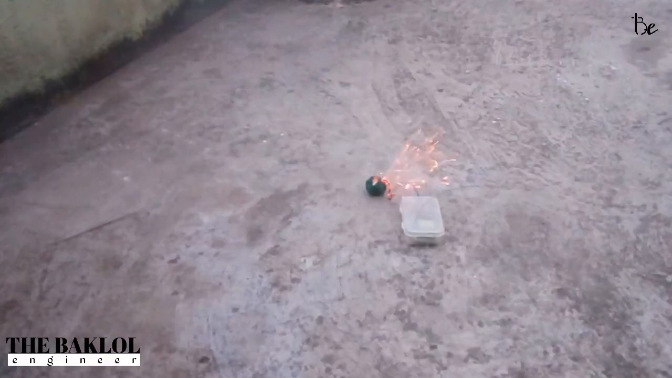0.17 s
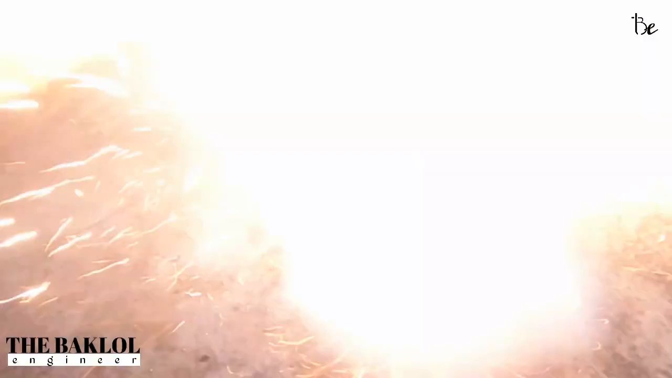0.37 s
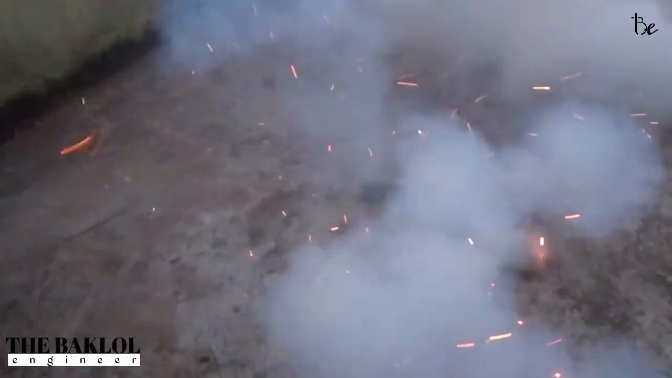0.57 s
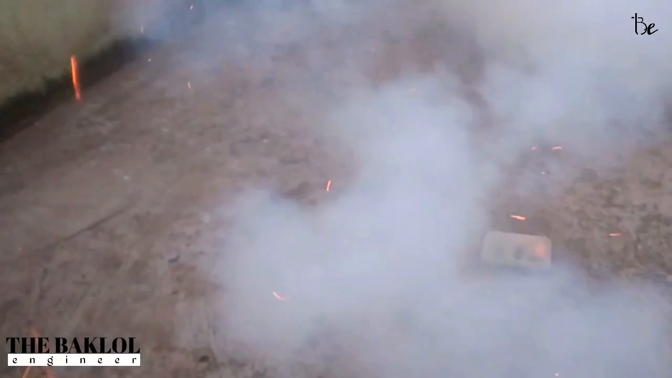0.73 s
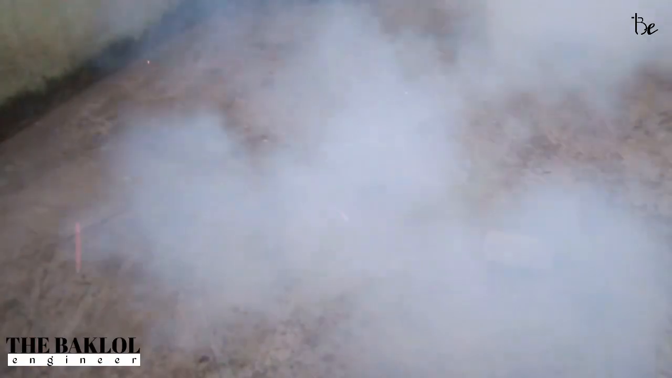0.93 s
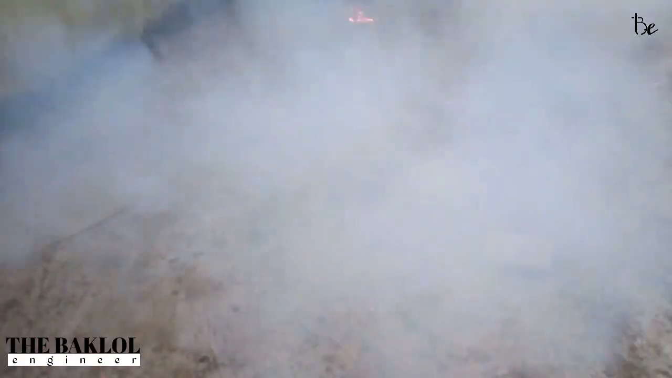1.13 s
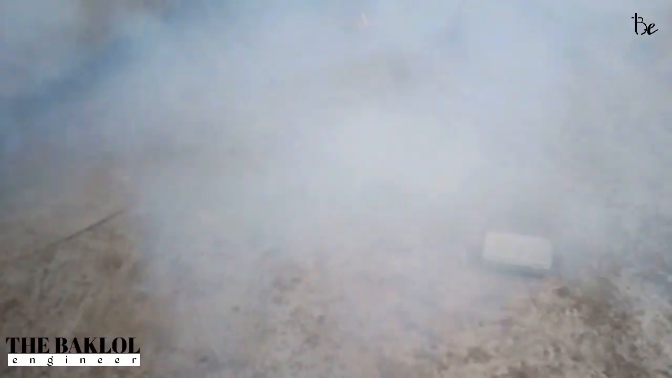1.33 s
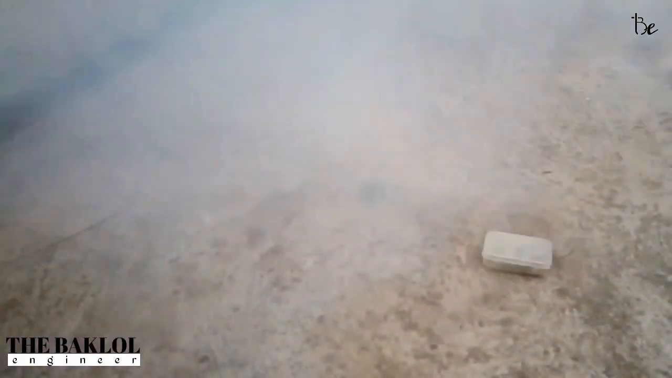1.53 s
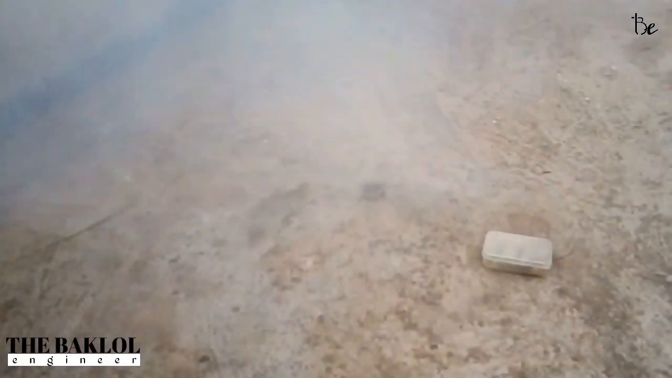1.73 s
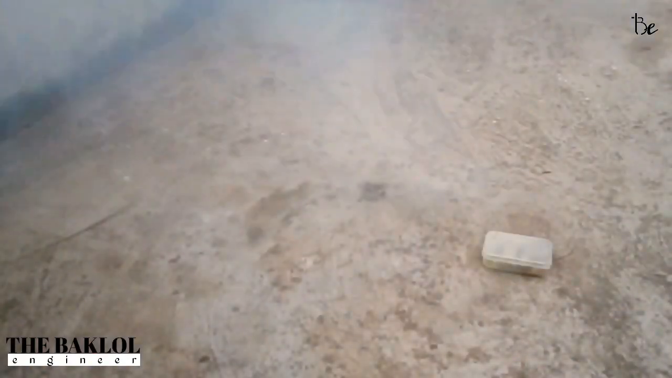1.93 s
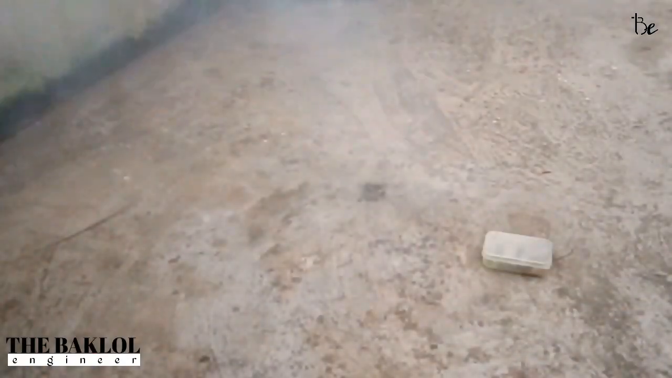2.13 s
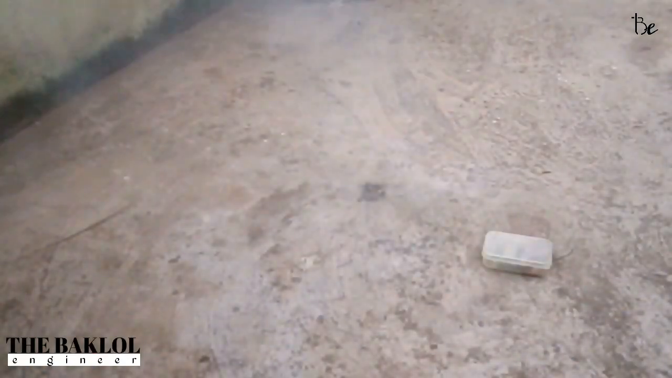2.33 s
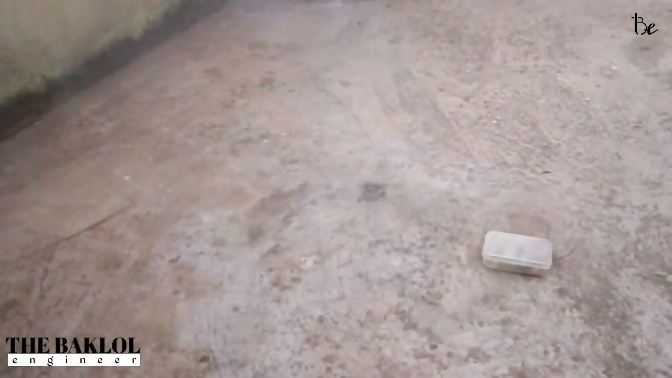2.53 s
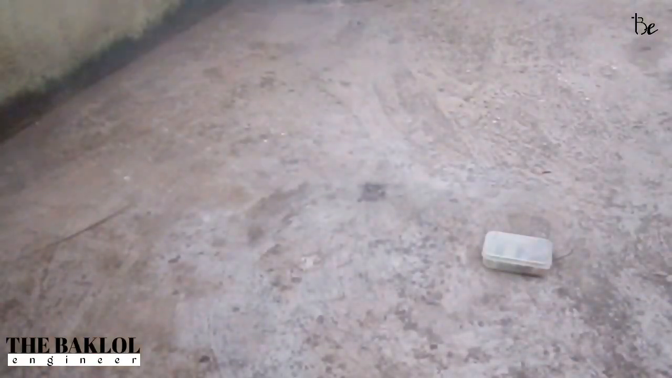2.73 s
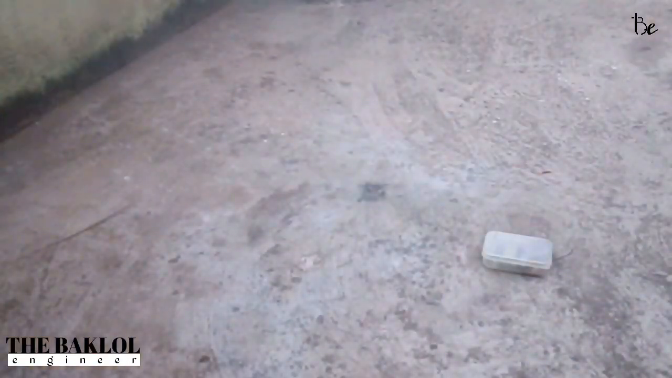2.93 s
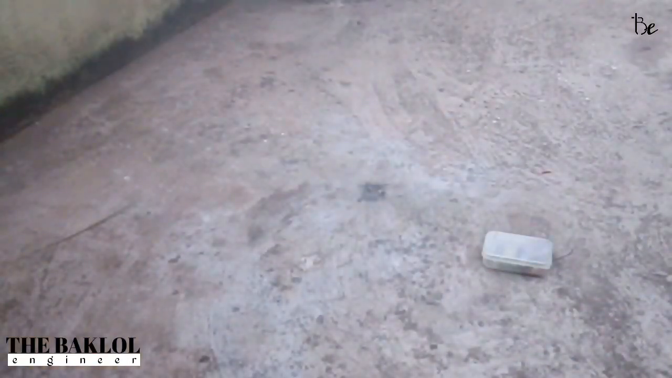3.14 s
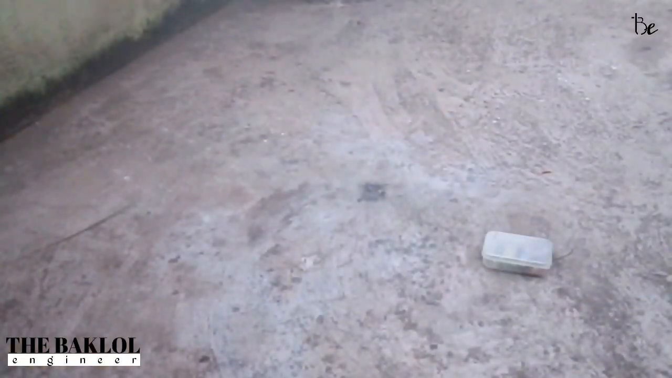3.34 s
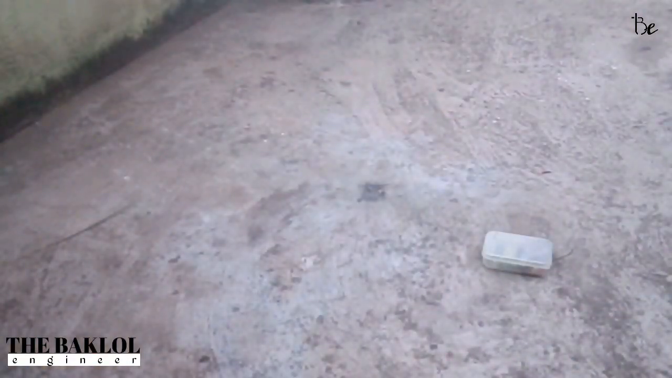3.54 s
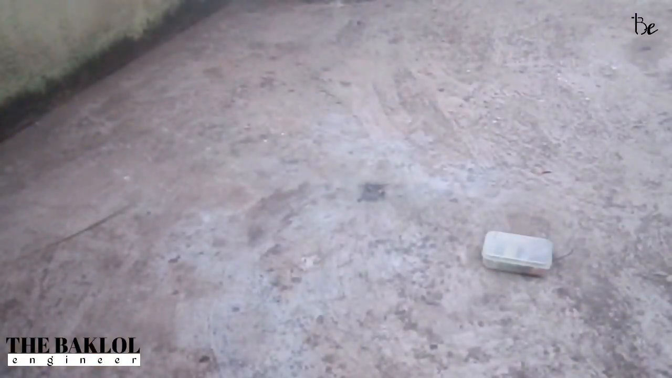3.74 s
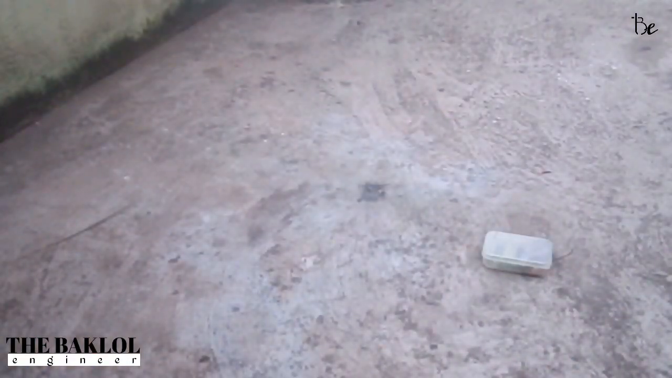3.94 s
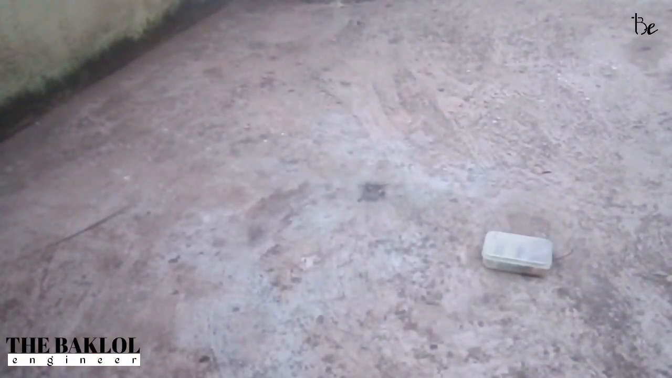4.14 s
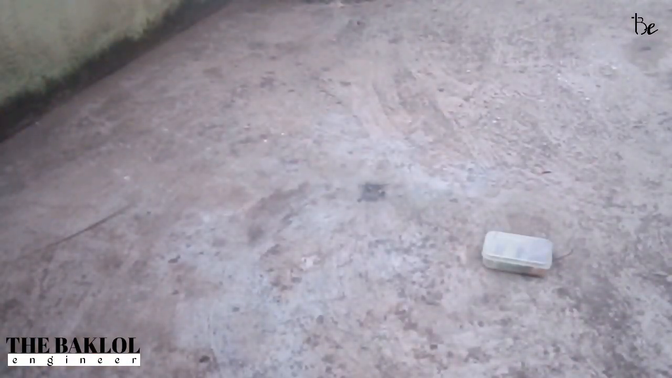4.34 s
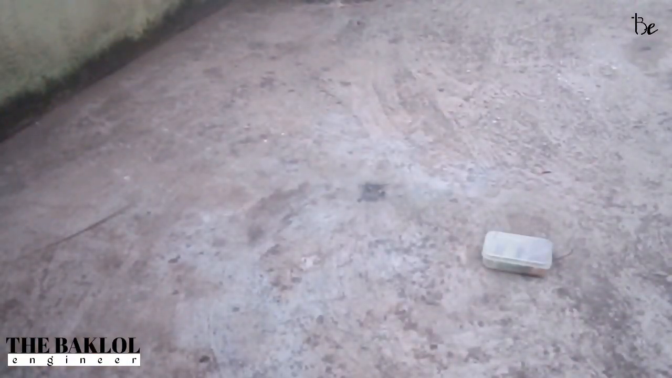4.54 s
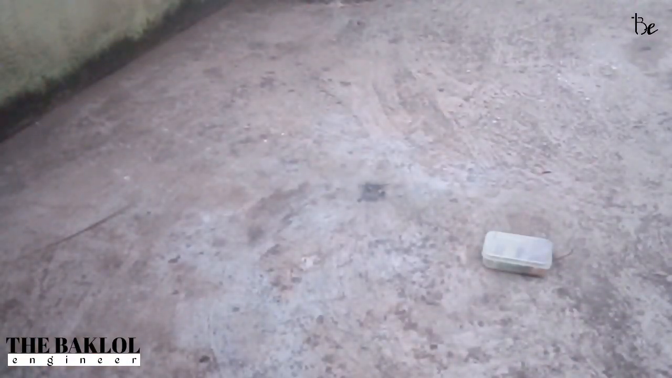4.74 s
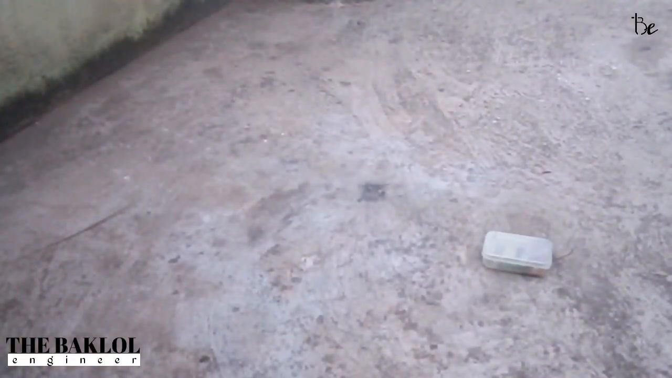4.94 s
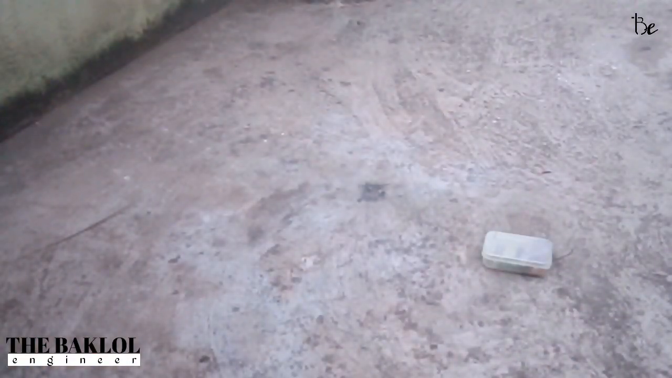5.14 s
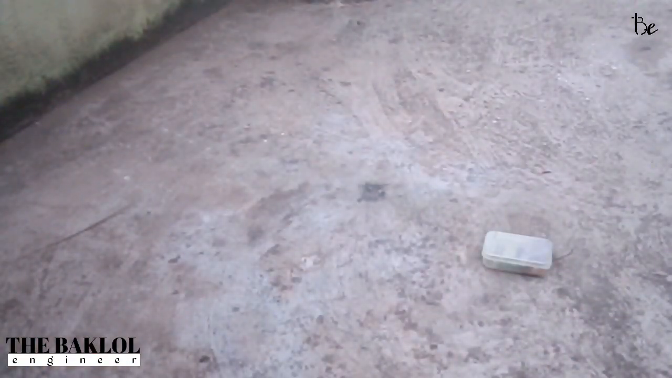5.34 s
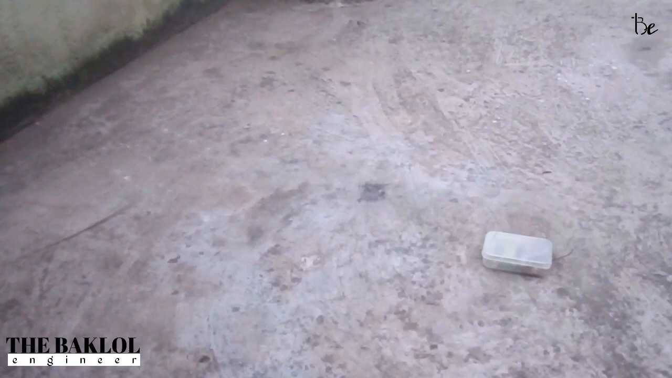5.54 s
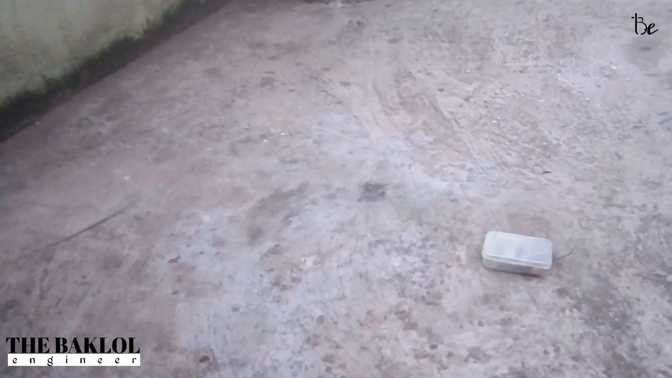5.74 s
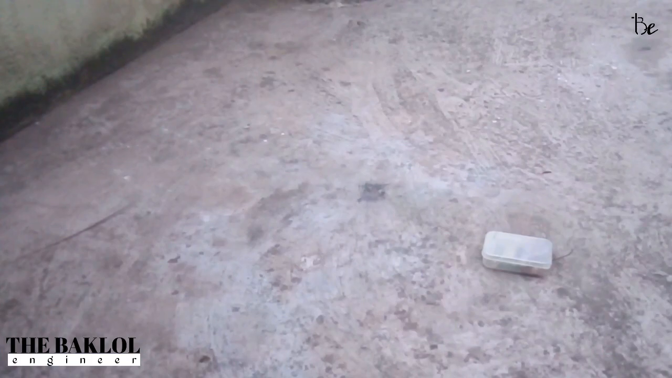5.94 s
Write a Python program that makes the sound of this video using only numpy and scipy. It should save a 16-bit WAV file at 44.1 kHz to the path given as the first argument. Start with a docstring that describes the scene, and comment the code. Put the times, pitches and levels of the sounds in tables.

```python
"""Firecracker in a concrete yard

A fuse hisses as shaped noise, then a ball firecracker bursts as an N-wave and overloads the microphone.
Decaying noise bands slap off near walls and roll back from further off, duller with distance; resonant
sheet metal hums after it. Crickets trill as pulsed tones and birds call as gliding sines; grit ticks as
damped sines and crunches as click swarms near the microphone, over a low noise murmur of town."""
import sys
import numpy as np
from scipy import signal
from scipy.fft import rfft, irfft
from scipy.io import wavfile
from scipy.ndimage import uniform_filter1d

SR = 44100
rng = np.random.default_rng(int(sys.argv[2]) if len(sys.argv) > 2 else 0)


def convert_level_to_amplitude(level_db):
    """Map a level in decibels to its linear amplitude factor."""
    exponent = np.asarray(level_db, float) / 20
    return 10 ** exponent


def transcribe(u):
    """Save the signal u as a 16-bit wav file named by the first command-line argument.

    u: samples, shape (n,) or (channels, n), limited to [-1, 1]; the rate is SR.
    q: integer samples, one column per channel.
    """
    v = np.clip(np.atleast_2d(u).T, -1, 1)
    q = np.round(v * 32767).astype(np.int16)
    wavfile.write(sys.argv[1], SR, q)


N = 268745
T = np.arange(N) / SR
BANG_S = 0.3262


def level(x, db):
    """Root-mean-square normalisation: scale to an rms level in dB."""
    return x * convert_level_to_amplitude(db) / np.sqrt(np.mean(x ** 2))


def read(table, hz, column=1):
    """Logarithmic frequency scale: interpolate a table column along log frequency."""
    table = np.array(table, float)
    return np.interp(np.log(hz), np.log(table[:, 0]), table[:, column])


def noise(colour, size=N):
    """Spectral shaping: Gaussian noise of a given colour, rms 1, silent outside the table."""
    hz = np.maximum(np.arange(size // 2 + 1) * SR / size, 1)
    inside = (hz >= colour[0][0]) & (hz <= colour[-1][0])
    spectrum = rfft(rng.standard_normal(size)) * convert_level_to_amplitude(read(colour, hz)) * inside
    return level(irfft(spectrum, size), 0)


def half_octave(hz):
    """Power-complementary bands: noise in a half-octave bell; neighbours sum to white noise."""
    octaves = np.log2(np.maximum(np.arange(N // 2 + 1) * SR / N, 1) / hz)
    bell = np.cos(np.pi * np.clip(octaves, -0.5, 0.5))
    return irfft(rfft(rng.standard_normal(N)) * bell, N)


def band(x, hz, width):
    """Simple resonance: a two-pole band-pass."""
    return signal.lfilter(*signal.iirpeak(min(hz, SR / 2.2), max(hz / width, 0.2), fs=SR), x)


def walk(rate):
    """Slow random modulation: levels held 1 / rate s and slewed; spread near 1."""
    hold = int(SR / rate)
    return uniform_filter1d(np.repeat(rng.standard_normal(N // hold + 1), hold), hold)[:N]


def add(out, s, x):
    """Superposition: mix a short sound in at a time."""
    i = int(s * SR)
    out[i:i + len(x)] += x[:N - i]


# Shock, wall slap and far roll.
# Near walls: frequency_hz, relative_density_db (per Hz), t60_s
WALL_SLAP = [(40, -21.5, .8), (151, -5, 0.91), (604, 1, 0.69), (2000, -7.5, 0.78), (6000, -4.5, 0.36),
             (8900, -14.5, .3)]
# Colour of the roll: frequency_hz, relative_density_db (per Hz)
ROLL_COLOUR = [(25, -19), (60, -4), (110, -7.5), (180, -2), (300, 1.5), (500, -8.5), (1000, -12.5),
               (2500, -19), (6000, -19), (9000, -26)]
# Loss that grows with travel: frequency_hz, extra_loss_db_per_s
AIR_LOSS = [(25, 8.5), (200, 4), (600, 3.5), (1500, 7.5), (4000, 19), (9000, 45)]
# Far echoes rolling back, with a late swell from the furthest surfaces: time_s, relative_level_db
ROLL_LEVEL = [(0.34, 1.5), (0.6, 13), (0.97, 4), (1.03, -1), (1.45, -9), (1.63, -17), (1.92, -12.5),
              (2.07, -17), (2.52, -22.5), (2.66, -28)]
SLAP_GAIN_DB, ROLL_FADE_DB_PER_S = 16, 8.5
SHOCK_PEAK_DB, SHOCK_S = 11.0, 0.0017


def bang():
    """Blast wave and reverberation: an N-shaped shock, dense decaying slaps, then a roll dulled by distance."""
    age = np.maximum(T - BANG_S, 0)
    slap, roll = 0, 0
    for hz in 25 * 2 ** np.arange(0, 9, 0.5):
        wave = half_octave(hz)
        slap_db = read(WALL_SLAP, hz) - 60 * age / read(WALL_SLAP, hz, column=2)
        slap = slap + wave * convert_level_to_amplitude(slap_db)
        # the air loss stops growing 1.6 s after the bang
        roll_db = read(ROLL_COLOUR, hz) - read(AIR_LOSS, hz) * np.minimum(age, 1.6)
        # far surfaces answer in patches, each band in its own order
        roll = roll + wave * convert_level_to_amplitude(roll_db + 3.1 * walk(14))
    # past the last far surface the roll dies away
    fade_db = ROLL_FADE_DB_PER_S * np.maximum(T - ROLL_LEVEL[-1][0], 0)
    roll = roll * convert_level_to_amplitude(np.interp(T, *np.transpose(ROLL_LEVEL)) - fade_db)
    out = (slap * convert_level_to_amplitude(SLAP_GAIN_DB) + roll) * (T > BANG_S)
    # the microphone inverts the shock: it starts negative
    add(out, BANG_S, convert_level_to_amplitude(SHOCK_PEAK_DB) * np.linspace(-1, 1, int(SHOCK_S * SR)))
    return out


# Single house fronts answering: start_s, peak_db, centre_hz
HOUSE_FRONTS = [(0.44, 1, 90), (0.878, -8, 180), (1.089, -16, 466), (1.327, -24.5, 310), (1.46, -21, 260),
                (1.606, -37, 463), (1.71, -33.5, 191), (2.331, -59, 258)]


def echoes():
    """Discrete reflection: each house front returns a short dull thud of band-passed noise."""
    out, t = np.zeros(N), np.arange(int(0.15 * SR)) / SR
    for s, db, hz in HOUSE_FRONTS:
        thud = rng.standard_normal(len(t)) * np.minimum(t / 0.0034, 1) * convert_level_to_amplitude(-60 * t / 0.2)
        thud = band(band(thud, hz, 2.75 * hz), hz, 2.7 * hz)
        add(out, s, thud * convert_level_to_amplitude(db) / np.abs(thud).max())
    return out


# Modes of the sheet metal: mode_hz, struck_level_db, t60_s, answer_gain_db (to the blast and its echoes)
SHEET_MODES = [(177.9, -26, 2.9, 9), (287.5, -22.5, 0.59, 4.5), (463, -19.5, 3.4, 1.5),
               (560, -29.5, 1.1, -6), (1440, -35, 1.3, -8)]
SHEET_WIDTH_HZ = 4.5


def sheet(blast):
    """Modal resonance: metal struck by the blast and shaken by its echoes; the struck modes waver in level."""
    age = np.maximum(T - BANG_S, 0)
    out = np.zeros(N)
    for hz, db, t60, answer_db in SHEET_MODES:
        ring = convert_level_to_amplitude(db - 60 * age / t60 + 4.2 * walk(11)) * np.sin(2 * np.pi * hz * T)
        answer = convert_level_to_amplitude(answer_db) * band(blast, hz, SHEET_WIDTH_HZ)
        out = out + (T > BANG_S) * ring + answer
    return out


# Colour of the gas jet: frequency_hz, relative_density_db (per Hz)
FUSE_COLOUR = [(180, -36), (300, -7), (378, -4.5), (561, -1), (921, -9), (1370, -2.5), (5930, -0.5),
               (9000, 3.5), (15400, -0.5)]
FUSE_FLARES_S, FUSE_FLARE_S = 0.086, 0.054  # the jet catches at, and over
FUSE_START_DB, FUSE_GROWTH_DB_PER_S = -42.5, 62  # level once caught, then its growth up to 0 dB


def fuse():
    """Turbulent jet noise: a sputtering gas jet that catches, grows and stops when the charge lights."""
    catch = np.clip((T - FUSE_FLARES_S) / FUSE_FLARE_S, 0, 1)
    db = FUSE_START_DB + FUSE_GROWTH_DB_PER_S * (T - FUSE_FLARES_S - FUSE_FLARE_S)
    sputter_db = 1.5 * walk(60)
    return noise(FUSE_COLOUR) * catch * convert_level_to_amplitude(np.minimum(db, 0) + sputter_db) * (T < BANG_S)


# Grit snapping: start_s, initial_amplitude_db, pitch_hz
TICKS = [(3.7165, -13.5, 3350), (3.723, -16, 4360), (3.798, -29, 4780), (4.8935, -25.5, 5010),
         (4.9102, -18.5, 2270), (4.917, -22, 2740), (5.3388, -20.5, 5450), (5.348, -27, 3430)]
# Grit crunching: start_s, length_s, centre_hz, level_db
CRUNCHES = [(1.91, 0.028, 4000, -57), (2, 0.024, 4000, -66), (2.267, 0.053, 3340, -53.5),
            (2.858, 0.096, 3400, -57), (3.183, 0.054, 6000, -56), (3.71, 0.038, 3520, -49),
            (3.779, 0.06, 4900, -49.5), (4.874, 0.06, 4840, -40), (5.064, 0.046, 5500, -52),
            (5.319, 0.063, 4740, -50.5), (5.386, 0.03, 5000, -53)]
SNAP_CYCLES = 1.5  # cycles in which a snap falls to 1/e
CLICK_SPREAD_DB, CRUNCH_SWELL = 2.6, 0.9  # spread of click sizes, roundness of the swell


def grit():
    """Impulsive excitation: snaps are damped sines; crunches are swarms of tiny clicks."""
    out, t = np.zeros(N), np.arange(int(0.01 * SR)) / SR
    for s, db, hz in TICKS:
        add(out, s, convert_level_to_amplitude(db) * np.sin(2 * np.pi * hz * t) * np.exp(-hz * t / SNAP_CYCLES))
    for s, length, hz, db in CRUNCHES:
        size = int(length * SR)
        clicks = rng.standard_normal(size) * convert_level_to_amplitude(CLICK_SPREAD_DB * rng.exponential(size=size))
        crunch = band(band(clicks, hz, 4700), hz, 4680) * np.hanning(size) ** CRUNCH_SWELL
        add(out, s, level(crunch, db))
    return out


def bow(length):
    """Smooth envelope: half a sine period over a length in s."""
    return np.sin(np.linspace(0, np.pi, int(length * SR)))


def note(out, s, pitch, swell, db):
    """Frequency modulation: a near-sine whose phase sums a slightly wavering pitch."""
    waver = 1 + 0.01 * walk(30)
    pitch = pitch * waver[int(s * SR):][:len(pitch)]
    add(out, s, np.sqrt(2) * swell * convert_level_to_amplitude(db) * np.sin(2 * np.pi * np.cumsum(pitch) / SR))


# Loud bird, low note of each call: start_s, length_s, top_pitch_hz, dry_level_db
LOW_NOTES = [(2.1, 0.097, 1340, -51.5), (2.32, 0.078, 1340, -51.5), (2.63, 0.12, 1410, -48.5),
             (2.93, 0.15, 1450, -48), (3.325, 0.059, 1541, -48.5), (3.625, .12, 1520, -48),
             (3.93, 0.083, 1518, -47.5)]
# Loud bird, high flourish that ends each call: end_s, length_s, top_pitch_hz, dry_level_db
FLOURISHES = [(2.321, 0.092, 1730, -56), (2.624, 0.22, 1780, -54), (2.924, .19, 1867, -53),
              (3.224, 0.16, 1905, -55.5), (3.522, .135, 1868, -55.5), (3.821, .08, 1900, -54.5),
              (4.116, 0.12, 1987, -55.5)]
# Glide of a flourish: time_before_end_s, share_of_top_pitch
FLOURISH_GLIDE = [(0, 0.67), (.05, 1.0), (.068, .99), (.105, .86), (.18, .94)]
LOW_ARCH = 0.115  # share of the pitch lost at both ends of a low note


def loud_bird():
    """Pitch glide: each call pairs an arched low note with a gliding flourish."""
    out = np.zeros(N)
    for s, length, hz, db in LOW_NOTES:
        arch = 1 - LOW_ARCH * (1 - bow(length)) ** 2
        note(out, s, hz * arch, bow(length) ** 0.13, db)
    for end, length, hz, db in FLOURISHES:
        left = np.linspace(length, 0, int(length * SR))
        share = np.interp(left, *np.transpose(FLOURISH_GLIDE))
        share = uniform_filter1d(share, 500, mode="nearest")
        note(out, end - length, hz * share, bow(length) ** 0.33, db)
    return out


# Nearly level whistles of other birds: start_s, length_s, end_pitch_hz, dry_level_db
WHISTLES = [(1.554, 0.095, 2238, -56.5), (3.29, 0.13, 2570, -65), (3.533, 0.12, 2180, -53),
            (3.547, 0.11, 2600, -63), (3.806, 0.15, 2610, -56), (4.043, 0.086, 2634, -54.5),
            (4.308, 0.077, 2690, -54.5), (4.576, 0.13, 2675, -55.5), (4.916, 0.087, 2680, -56.5),
            (5.537, 0.13, 1987, -66.5), (5.912, .13, 1990, -67.5)]
WHISTLE_ARCH_HZ = 50.4  # rise at mid-note


def whistles():
    """Pure tone: whistles with a slight arch in pitch."""
    out = np.zeros(N)
    for s, length, hz, db in WHISTLES:
        note(out, s, hz + WHISTLE_ARCH_HZ * bow(length), bow(length) ** 0.24, db)
    return out


# Scratchy, toneless chatter of a further bird: start_s, length_s, centre_hz, dry_level_db
CHATTER = [(3.038, 0.16, 2050, -56.5), (3.323, 0.068, 2180, -54.5), (3.409, 0.073, 2400, -61),
           (3.563, 0.23, 2460, -56), (4.056, 0.11, 2450, -58), (5.751, 0.28, 1355, -65)]
CHATTER_WIDTH_HZ = 490


def chatter():
    """Band-limited noise: scratches without a pitch."""
    out = np.zeros(N)
    for s, length, hz, db in CHATTER:
        scratch = rng.standard_normal(len(bow(length)))
        scratch = band(band(scratch, hz, CHATTER_WIDTH_HZ), hz, CHATTER_WIDTH_HZ)
        add(out, s, level(scratch * bow(length) ** 0.4, db))
    return out


HOARSE, HOARSE_HZ = 0.5, 260  # breath noise riding on the song: share and rate


def birds():
    """Reverberant field: hoarse songs and chatter, smeared by the yard's echo."""
    song = loud_bird() + whistles()
    song = song * (1 + HOARSE * walk(HOARSE_HZ)) / np.hypot(1, HOARSE)
    calls = song + chatter()
    t = np.arange(int(0.8 * SR)) / SR
    tail = rng.standard_normal(len(t)) * convert_level_to_amplitude(-60 * t / 1.06)  # t60 1.06 s
    echo = signal.fftconvolve(calls, tail / np.linalg.norm(tail))[:N]
    return calls * convert_level_to_amplitude(2.3 * walk(40)) + convert_level_to_amplitude(-1.5) * echo


# Distant crowd of crickets: frequency_hz, relative_density_db (per Hz)
CHORUS_COLOUR = [(3600, -26.5), (4400, -3.5), (4900, 1), (5800, -3.5), (6500, -13.5), (7500, -24)]
# Single crickets: wing_pitch_hz, strokes_per_s, mean_level_db
CRICKETS = [(4775, 81, -57.5), (5230, 88, -63.5), (5800, 110, -67)]
CHORUS_DB = -54.5


def crickets():
    """Amplitude modulation: each wing stroke pulses a tone; the distant crowd blurs into a hiss."""
    out = noise(CHORUS_COLOUR) * convert_level_to_amplitude(CHORUS_DB + 2.7 * walk(3))
    for hz, rate, db in CRICKETS:
        stroke = np.cumsum(rate * (1 + 0.0077 * walk(6.4))) / SR
        pulse = 0.41 + np.maximum(np.sin(2 * np.pi * stroke), 0)
        trill = level(pulse * np.sin(2 * np.pi * hz * T), db)
        # the trill's strength varies slowly, and about from stroke to stroke
        out = out + trill * convert_level_to_amplitude(1.3 * walk(2.6) + 1.9 * walk(90))
    return out


# Colour of the murmur: frequency_hz, relative_density_db (per Hz)
TOWN_COLOUR = [(15, -46.5), (25, -17), (143, -1.5), (258, -10.5), (532, -20.5), (1010, -17.5), (1380, -16),
               (2250, -21.5), (4000, -24), (5200, -56), (8800, -120)]
TOWN_DB, TOWN_FADES_S, TOWN_FADE_DB_PER_S = -52, 4.3, 2.5  # the murmur holds, then ebbs


def town():
    """Diffuse background: low coloured noise that wavers slightly and ebbs near the end."""
    fade_db = TOWN_FADE_DB_PER_S * np.maximum(T - TOWN_FADES_S, 0)
    return noise(TOWN_COLOUR) * convert_level_to_amplitude(TOWN_DB - fade_db + 0.26 * walk(1.5))


def scene():
    """Superposition: everything in the yard, summed to one channel."""
    blast = bang() + echoes()
    return (blast + sheet(blast) + fuse() + grit() + birds() + crickets() + town())[None]


def top_cut(x):
    """Nothing passes above the cut-off."""
    return signal.sosfilt(signal.butter(12, 15590, fs=SR, output="sos"), x)


# Colour of the microphone's own hiss: frequency_hz, relative_density_db (per Hz)
MIC_HISS_COLOUR = [(100, 0.5), (8000, 0), (10000, -3.5), (13000, -7.5), (16000, -10.5)]
CAPSULE_TOP, MIC_HISS_DB = 1.8, -86.5  # amplitude the capsule cannot pass, rms of the hiss
MIC_TOP_HZ, MIC_STEEPNESS, MIC_SHELF_DB = 6660, 22, -25  # shelf: what passes above the top


def record(dry):
    """Nonlinear distortion: the capsule saturates, treble drops to a low shelf, the converter clips hard."""
    capsule = CAPSULE_TOP * np.tanh(dry / CAPSULE_TOP)
    hz = np.arange(N // 2 + 1) * SR / N
    treble = np.sqrt(1 / (1 + (hz / MIC_TOP_HZ) ** MIC_STEEPNESS) + convert_level_to_amplitude(MIC_SHELF_DB) ** 2)
    heard = irfft(rfft(capsule) * treble, N) + convert_level_to_amplitude(MIC_HISS_DB) * noise(MIC_HISS_COLOUR)
    mix = np.clip(heard, -0.97, 0.97)
    return top_cut(mix)


dry = scene()
out = record(dry)
transcribe(out)
```